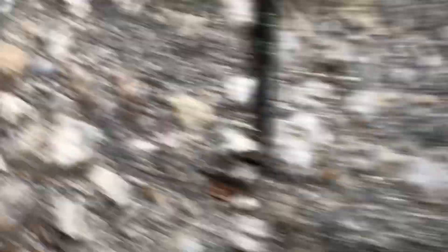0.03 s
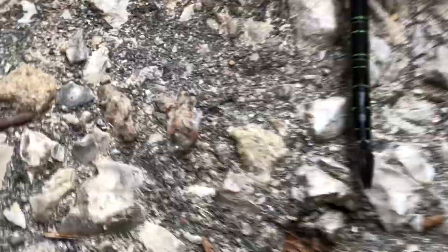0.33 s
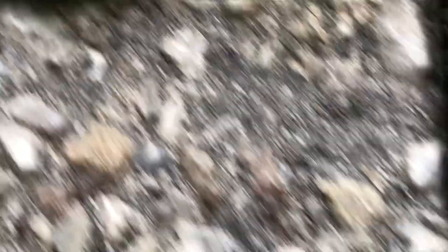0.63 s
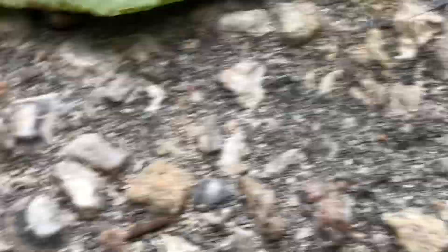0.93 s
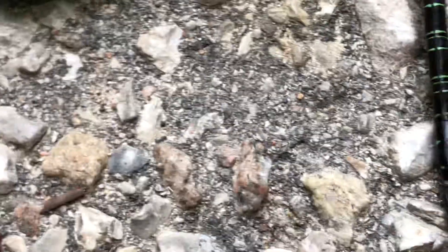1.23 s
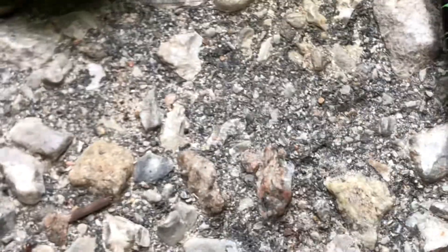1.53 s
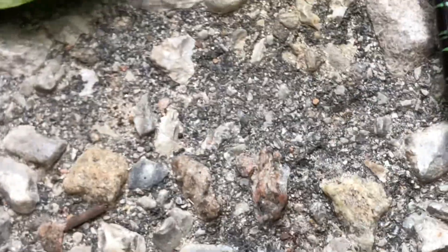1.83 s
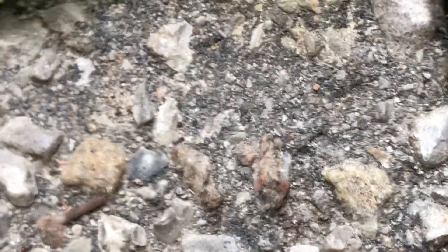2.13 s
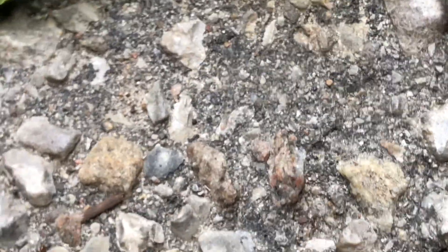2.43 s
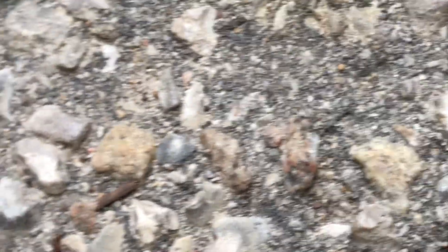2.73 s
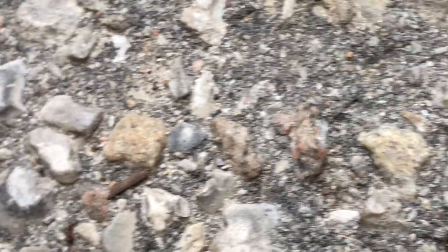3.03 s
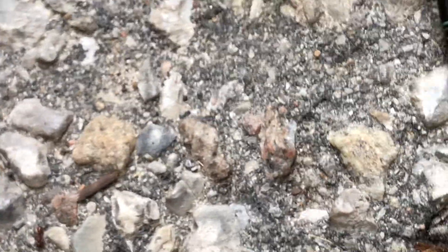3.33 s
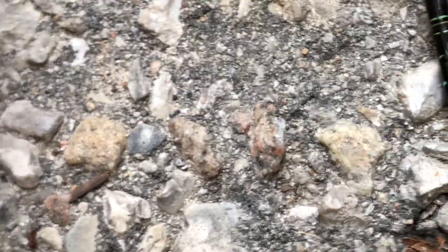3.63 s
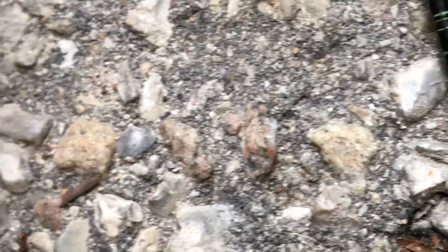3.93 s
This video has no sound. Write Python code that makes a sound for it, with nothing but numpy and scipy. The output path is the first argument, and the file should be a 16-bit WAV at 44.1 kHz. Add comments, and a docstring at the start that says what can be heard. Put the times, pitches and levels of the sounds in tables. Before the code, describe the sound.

Insect wings flutter dryly against rough pavement, falter, then twitch and scrape faintly.

```python
"""Trapped dragonfly on pavement

Dry wings beat on rough pavement, close by. Each impact excites the damped modes of a stiff membrane.
The fast run of crisp strikes falters into feeble twitches and stick-slip scrapes, then starts again.
One early reflection colours the wings; under them lie a faint far rumble and a thin, wavering hiss."""
import sys
import numpy as np
from scipy import signal
from scipy.fft import rfft, irfft
from scipy.io import wavfile

SR = 44100
rng = np.random.default_rng(int(sys.argv[2]) if len(sys.argv) > 2 else 0)


def to_wav(s):
    """Save 16-bit WAV."""
    ch = np.atleast_2d(s).T  # columns
    pcm = np.round(np.clip(ch, -1, 1) * 32767)  # PCM
    wavfile.write(sys.argv[1], SR, pcm.astype(np.int16))


N = 176400
TIME = np.arange(N) / SR
CONTACT_S = 0.02
AGE = TIME[:int(CONTACT_S * SR)]   # time since a contact began [s]


def from_db(db):
    """Amplitude ratio: a factor of ten for every 20 dB."""
    return 10 ** (np.asarray(db) / 20)


def unit_rms(x):
    """Normalisation to unit mean power."""
    return x / np.sqrt(np.mean(x ** 2) + 1e-20)


def colour(x, spectrum, modes=()):
    """Minimum-phase filtering at unit power gain: a spectral envelope plus resonance peaks."""
    size = 2 * N
    hz = np.maximum(np.arange(N + 1) * SR / size, 1)
    points_hz, points_db = np.transpose(spectrum)
    db = np.interp(np.log(hz), np.log(points_hz), points_db)
    for centre, width, boost in modes:
        db = db + boost / (1 + (2 * (hz - centre) / width) ** 2)
    cepstrum = irfft(np.log(unit_rms(from_db(db))))
    cepstrum[1:N] *= 2   # folding the cepstrum makes the filter causal
    cepstrum[N + 1:] = 0
    return irfft(rfft(x, size) * np.exp(rfft(cepstrum)))[:N]


def add(out, start_s, sound):
    """Superposition: a short sound sums into a track."""
    i = int(np.clip(start_s * SR, 0, N - 1))
    out[i:i + len(sound)] += sound[:N - i]


# Spectrum of the rumble: (frequency [Hz], relative level [dB])
RUMBLE_SPECTRUM = [(20, -22), (35, -24.5), (50, -6.5), (66, 0.5), (85, -3), (160, -1.5), (250, -6.5),
                   (330, -13), (480, -18), (850, -20.5), (1300, -27), (2200, -36), (5000, -44.5),
                   (7000, -45), (15000, -51)]

def far_rumble():
    """Stationary noise with its power concentrated at low frequencies."""
    return from_db(-52.5) * colour(rng.standard_normal(N), RUMBLE_SPECTRUM)


# Envelope of the hiss: (time [s], level [dB])
HISS_ENVELOPE = [(0, -66), (.15, -65), (.35, -63.5), (.5, -69), (.62, -65), (.9, -67), (1.2, -72),
                 (1.5, -78.5), (1.9, -68), (2.2, -76), (2.55, -70), (2.8, -78.5), (3.0, -71.5),
                 (3.2, -70.5), (3.4, -73.5), (3.8, -70.5), (4, -72.5)]
# Spectrum of the hiss: (frequency [Hz], relative level [dB])
HISS_SPECTRUM = [(500, -2), (1200, -2), (2400, -0.5), (4000, 4), (6500, -5), (9000, -7), (15000, -8.5),
                 (16500, -42)]

def thin_hiss():
    """Slow amplitude modulation makes broadband noise swell and fade."""
    envelope = from_db(np.interp(TIME, *np.transpose(HISS_ENVELOPE)))
    return envelope * colour(rng.standard_normal(N), HISS_SPECTRUM)


def normalise_burst(x):
    """Equal energy: a burst is scaled to match 5 ms of signal at unit rms."""
    return unit_rms(x) * np.sqrt(0.005 / CONTACT_S)


def puff(decay_s):
    """Impulsive excitation: noise with a sudden onset and exponential decay."""
    return normalise_burst(rng.standard_normal(len(AGE)) * np.exp(-AGE / decay_s))


def grains(spread_db, count):
    """Granular noise: dense micro-clicks with exponentially distributed levels."""
    sizes = np.minimum(rng.exponential(1, count), 5)
    return unit_rms(rng.standard_normal(count) * from_db(spread_db * sizes))


def crinkle(decay_s):
    """Two-stage decay: membrane clicks die fast, leaving a faint tail as the wing slides on."""
    envelope = np.exp(-AGE / decay_s) + from_db(-6.5) * np.exp(-AGE / 0.0034)
    return normalise_burst(grains(spread_db=3, count=len(AGE)) * envelope)


def resonance(x, hz, width_hz):
    """A damped oscillator: a two-pole band-pass with unit peak gain."""
    radius = np.exp(-np.pi * width_hz / SR)
    feedforward = np.array([1, 0, -1]) * (1 - radius ** 2) / 2
    feedback = [1, -2 * radius * np.cos(2 * np.pi * hz / SR), radius ** 2]
    return signal.lfilter(feedforward, feedback, x)


def membrane_ring(x, hz, boost_db):
    """A membrane mode amplifies the band around its natural frequency."""
    return x + (from_db(boost_db) - 1) * resonance(x, hz, width_hz=700)


def patch_ring(x):
    """Local resonance: each contact rings a different patch of membrane, at a random frequency."""
    return normalise_burst(membrane_ring(x, rng.uniform(4960, 14960), boost_db=5.5))


# Impacts of a wing on the pavement: (time [s], level [dB])
STRIKES = [(0.0792, -43.5), (0.1049, -42), (0.1338, -43), (0.1658, -41), (0.1953, -42), (0.2203, -44),
           (0.2496, -45), (0.2785, -43.5), (0.306, -42), (0.3328, -44), (0.363, -40.5), (0.391, -41),
           (0.4187, -43), (0.4452, -43.5), (0.474, -40.5), (0.5022, -42), (0.5296, -44), (0.556, -40.5),
           (0.5817, -41.5), (0.6073, -41), (0.6345, -41), (0.6605, -34.5), (0.688, -40.5), (0.7165, -40),
           (0.7427, -37.5), (0.7687, -40.5), (0.7943, -41.5), (0.8242, -44), (0.849, -35), (0.8756, -42),
           (0.904, -43.6), (0.9293, -40.5), (0.958, -43.5), (0.9831, -37), (1.0131, -40), (1.038, -39),
           (1.063, -39), (1.093, -42), (1.1175, -40), (1.143, -39.5), (1.1708, -38), (1.195, -36.5),
           (1.2257, -49), (1.248, -39), (1.2774, -38), (1.3043, -38.5), (1.332, -42.5), (1.3593, -44),
           (1.3836, -43.5), (1.4099, -42.5), (1.4384, -41), (1.4655, -45.5), (1.5208, -53), (1.5468, -49),
           (1.5724, -44.5), (1.6022, -44), (1.656, -42.5), (1.6876, -59), (1.7088, -43), (1.7345, -42),
           (1.758, -44), (1.7867, -41), (1.8129, -42.5), (3.8907, -48.5), (3.916, -53.3), (3.9442, -47.5),
           (3.9724, -47), (3.9974, -53)]
# Dull flexing of the whole wing at mean force: (time [s], level [dB])
FLEX_LEVELS = [(.08, -51), (.55, -51.5), (1.05, -52), (1.3, -54), (1.55, -56), (1.78, -50.5), (3.9, -56.5)]
# The wing's bright ring, set by the way it lies: (start [s], frequency [Hz], boost [dB])
POSES = [(0, 12300, 6.5), (.57, 11500, 3.5), (1.32, 8200, 5.5), (1.7, 11800, 3)]
# Resonances of the stiff wing: (frequency [Hz], bandwidth [Hz], boost [dB])
WING_MODES = [(3835, 280, 5), (4780, 390, 3), (6240, 400, 1.5)]
# Spectra of the clicks and of the flexing: (frequency [Hz], relative level [dB])
STRIKE_SPECTRUM = [(300, -32), (900, -14.5), (1500, -15.5), (2400, -10.5), (3100, -3), (4500, -2),
                   (8000, -0.5), (11500, 0.8), (14000, -2), (15600, 0), (16500, -20)]
FLEX_SPECTRUM = [(250, -20.5), (550, -11), (900, 0.5), (1250, -6), (1700, -4.5), (2400, -11), (3200, -0.5),
                 (6000, -18.5)]

def wing_strikes(crinkle_s=0.0014):
    """Impact excitation: the wing snaps, crinkles, rings and flexes; harder hits snap more."""
    clicks, flexing = np.zeros((2, N))
    mean_db = np.mean([db for _, db in STRIKES])
    papery_highpass = signal.butter(2, 4500, "high", fs=SR, output="sos")
    for onset, db in STRIKES:
        force_db = db - mean_db
        pose = sum(onset >= start for start, _, _ in POSES[1:])
        _, ring_hz, ring_db = POSES[pose]
        snap = from_db(-8 + 1.8 * force_db) * signal.sosfilt(papery_highpass, puff(decay_s=0.00022))
        contact = membrane_ring(snap + crinkle(crinkle_s), ring_hz, ring_db)
        add(clicks, onset, from_db(db - 0.98) * patch_ring(contact))
        flex_db = np.interp(onset, *np.transpose(FLEX_LEVELS)) + 0.25 * force_db
        add(flexing, onset, from_db(flex_db) * puff(decay_s=0.0028))
        backstroke_s = onset + rng.normal(0.012, 0.0013)
        backstroke_db = db + rng.normal(-31, 5.6)
        add(clicks, backstroke_s, from_db(backstroke_db) * crinkle(crinkle_s))
    return colour(clicks, STRIKE_SPECTRUM, WING_MODES) + colour(flexing, FLEX_SPECTRUM)


def friction(judder_hz=160, judder_db=4):
    """Irregular catching and slipping modulates the level of a stream of fine grains."""
    lowpass = signal.butter(2, judder_hz, fs=SR, output="sos")
    judder = unit_rms(signal.sosfilt(lowpass, rng.standard_normal(N)))
    return unit_rms(grains(spread_db=1, count=N) * from_db(judder_db * judder))


# Drags over the grit: (start [s], duration [s], level [dB], rasp share of power [0-1])
SCRAPES = [(0.328, 0.07, -64, 0.1), (1.693, .13, -67.5, .5), (1.811, 0.051, -64, 0.06),
           (1.865, 0.026, -58, 0), (1.919, .049, -52.5, 0.08), (1.97, 0.063, -70, 0),
           (2.083, 0.029, -61.5, 0), (2.27, 0.054, -65, 0), (2.424, .043, -62.5, 0),
           (2.464, 0.062, -63.5, 0), (2.537, 0.098, -63.5, 0), (2.857, .037, -62.5, 0.04),
           (2.931, 0.116, -77, 0.8), (3.139, .14, -65, 0), (3.494, 0.037, -57, 0.65), (3.539, .017, -50, 1),
           (3.555, 0.047, -60, .85), (3.601, 0.07, -70, 1), (3.74, 0.08, -67, 0.8)]
# Spectra of the sizzle and of the rasp: (frequency [Hz], relative level [dB])
SIZZLE_SPECTRUM = [(400, -25), (1500, -6), (2800, 0), (4000, 1.5), (6500, 1), (10000, 0), (13000, 1.5),
                   (15500, -2), (16500, -22)]
RASP_SPECTRUM = [(800, -10), (2500, 0.5), (7000, 0), (12000, -7), (15600, -5), (16500, -22)]
# Resonances of the rasp: (frequency [Hz], bandwidth [Hz], boost [dB])
RASP_MODES = [(4330, 450, 9), (7920, 650, 10), (9230, 300, 4), (14900, 400, 6)]

def wing_scrapes(ramp_s=0.0036):
    """Stick-slip friction drives the dragged wing: a fine sizzle, a ringing rasp and a soft scuff."""
    sizzle_gain, rasp_gain, scuff_gain = np.zeros((3, N))
    for start, duration, db, rasp_share in SCRAPES:
        touch = np.clip(np.minimum(TIME - start, start + duration - TIME) / ramp_s, 0, 1)
        sizzle_gain += touch * from_db(db) * np.sqrt(1 - rasp_share)
        rasp_gain += touch * from_db(db) * np.sqrt(rasp_share)
        scuff_db = -47.5 + 0.39 * db   # grows only slowly with pressure
        scuff_gain += touch * from_db(scuff_db) * np.sqrt(1 - rasp_share)
    sizzle = colour(sizzle_gain * friction(), SIZZLE_SPECTRUM, WING_MODES)
    rasp = colour(rasp_gain * friction(), RASP_SPECTRUM, RASP_MODES)
    scuff = scuff_gain * unit_rms(resonance(friction(), hz=2100, width_hz=740))
    return sizzle + rasp + scuff


# Brushes of a twitching wing on the grit: (time [s], level [dB])
TWITCHES = [(0.86, -51), (1.3154, -52), (1.714, -55), (1.738, -48), (1.8217, -49), (1.8344, -52.6),
            (1.8663, -53), (1.8753, -45), (1.8815, -52), (1.8893, -42), (1.903, -46), (1.9962, -51.5),
            (2.043, -45.5), (2.0515, -51), (2.103, -55), (2.108, -52.5), (2.1286, -49), (2.175, -54.5),
            (2.1845, -51.0), (2.247, -52.5), (2.2576, -48), (2.286, -48), (2.311, -55), (2.3176, -56),
            (2.3383, -55.5), (2.3643, -62), (2.389, -52), (2.3974, -59), (2.4674, -52), (2.4781, -52),
            (2.491, -49), (2.514, -48), (2.54, -55), (2.548, -45), (2.5562, -57), (2.5679, -48),
            (2.576, -51), (2.59, -56), (2.6005, -52.5), (2.6125, -60), (2.627, -47.5), (2.638, -59),
            (2.6565, -55), (2.6638, -51.5), (2.6815, -47.5), (2.689, -47), (2.71, -51), (2.7169, -49),
            (2.7356, -58), (2.747, -55.5), (2.815, -63), (2.8384, -57.5), (2.9896, -60), (3.0649, -60.5),
            (3.1396, -59), (3.168, -64), (3.265, -56.5), (3.2972, -53), (3.3183, -56), (3.3447, -53.5),
            (3.4262, -55), (3.453, -57), (3.5856, -46), (3.711, -65), (3.8129, -53), (3.8362, -43.5),
            (3.8453, -53), (3.99, -47)]
# Spectrum of the twitches: (frequency [Hz], relative level [dB])
TWITCH_SPECTRUM = [(600, -22), (2200, -6), (3600, -2), (8000, -1), (11800, 2), (14000, 0), (15600, 1.5),
                   (16500, -27)]

def wing_twitches(rise_s=0.00044):
    """Weak contacts with a finite rise time excite a bright crinkle without a snap."""
    clicks = np.zeros(N)
    attack = 1 - np.exp(-AGE / rise_s)
    for onset, db in TWITCHES:
        add(clicks, onset, from_db(db - 0.8) * patch_ring(attack * crinkle(decay_s=0.0021)))
    return colour(clicks, TWITCH_SPECTRUM, WING_MODES)


def early_reflection(x, delay_s=0.00111, echo_db=-15):
    """Comb filtering: a bounce off a hard surface nearby interferes with the direct sound."""
    delayed = np.pad(x, (int(delay_s * SR), 0))[:N]
    return x + from_db(echo_db) * delayed


def scene():
    """Superposition of the outdoor background, the wings and their reflection, in mono."""
    background = far_rumble() + thin_hiss()
    wings = wing_strikes() + wing_scrapes() + wing_twitches()
    return (background + early_reflection(wings))[None]


def record(dry):
    """Band limiting: a steep elliptic low-pass removes the highest treble."""
    cutoff_hz = 16600
    return signal.sosfilt(signal.ellip(10, .1, 70, cutoff_hz, fs=SR, output="sos"), dry)


dry = scene()
out = record(dry)
to_wav(out)
```